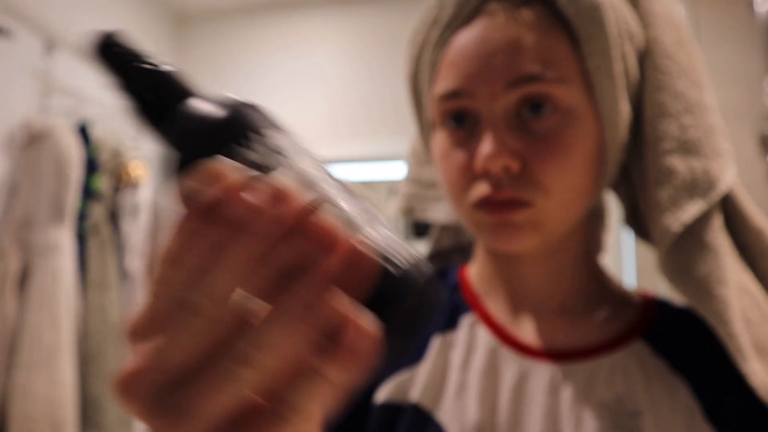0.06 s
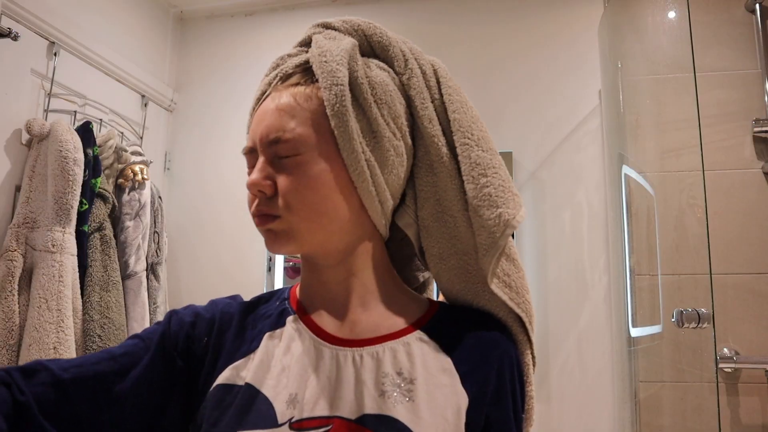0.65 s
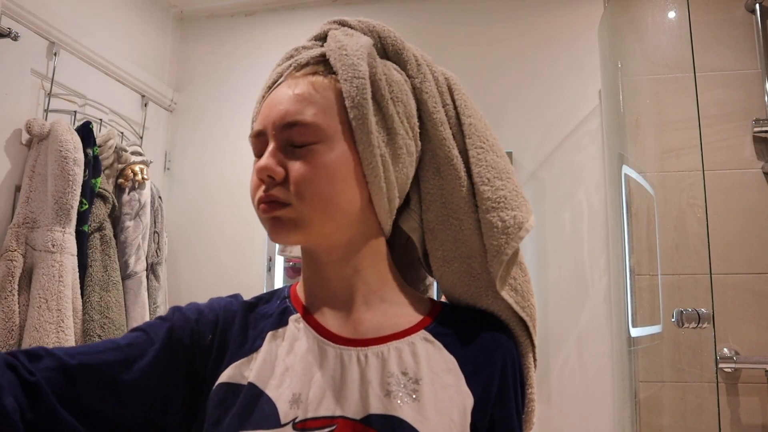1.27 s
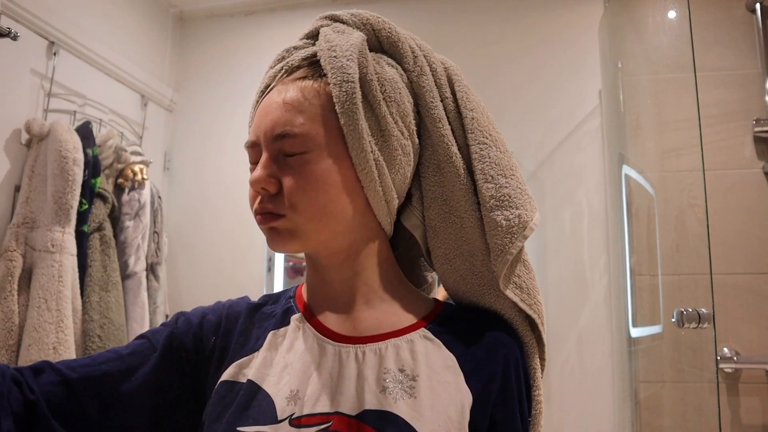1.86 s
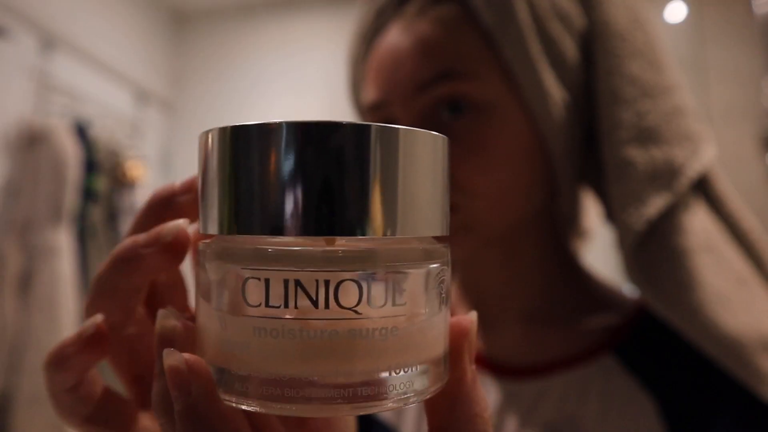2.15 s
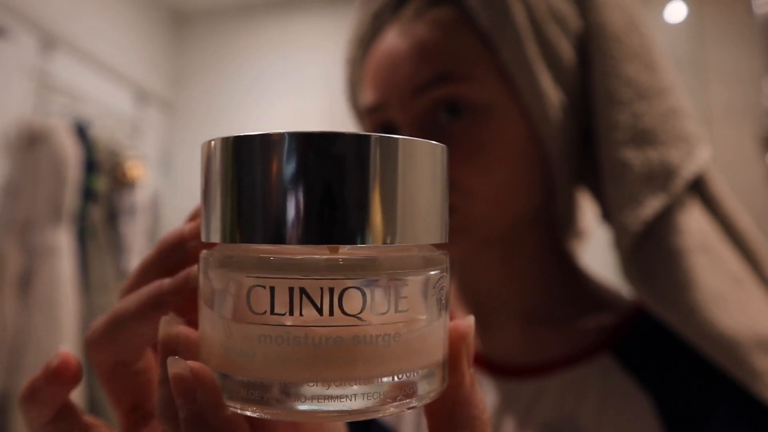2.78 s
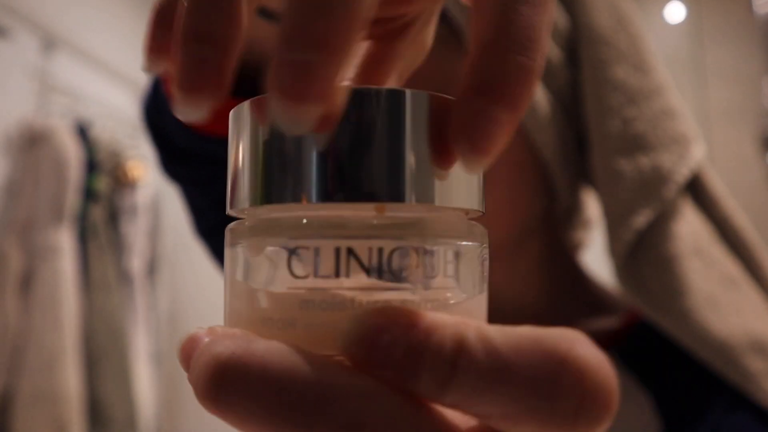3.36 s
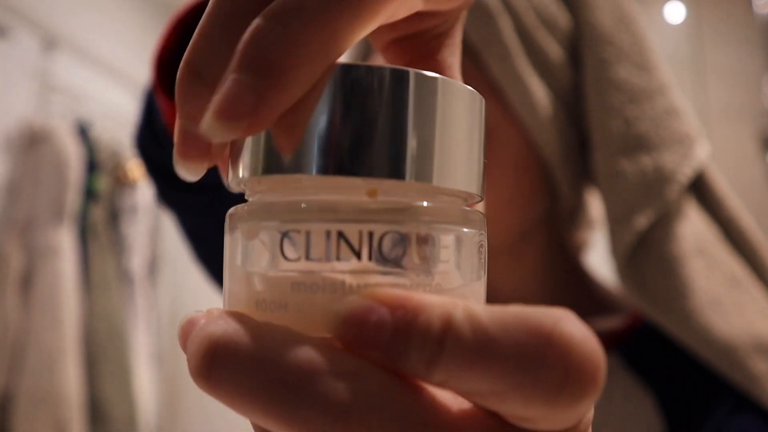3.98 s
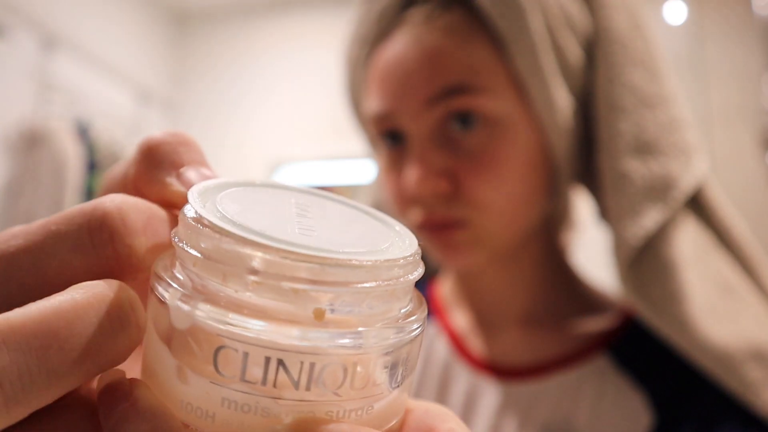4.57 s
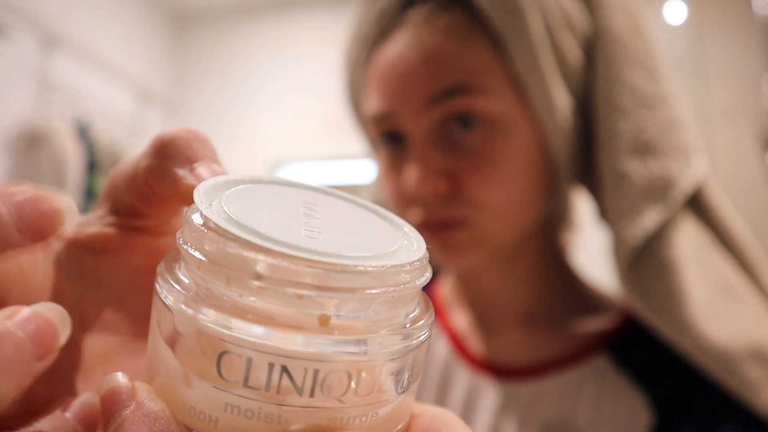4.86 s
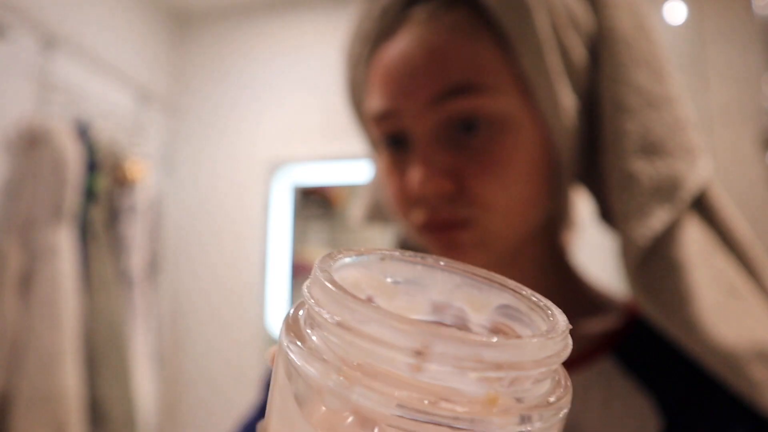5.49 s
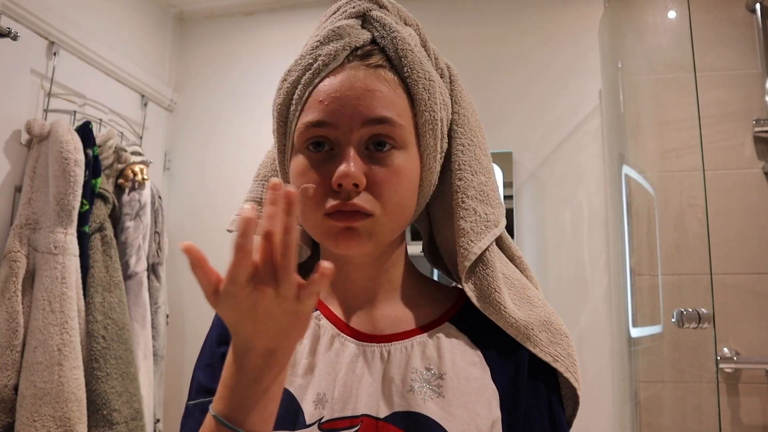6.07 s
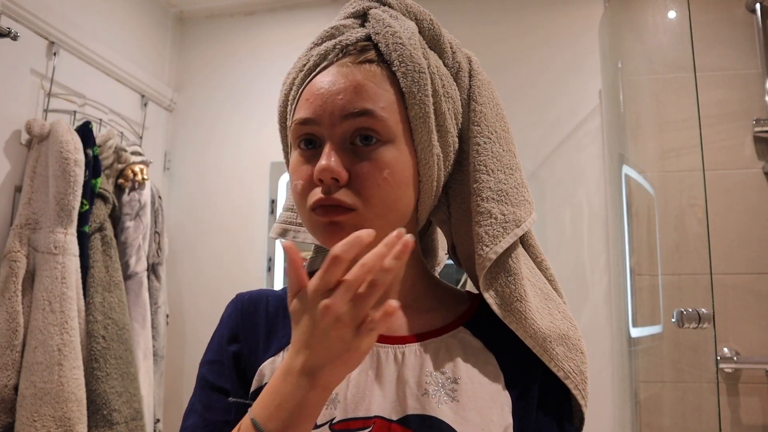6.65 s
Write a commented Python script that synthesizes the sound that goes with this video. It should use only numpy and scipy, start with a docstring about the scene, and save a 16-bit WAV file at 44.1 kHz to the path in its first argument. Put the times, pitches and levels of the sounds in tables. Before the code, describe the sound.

For the first half second a small spray bottle is shaken five times, its liquid splashing and glugging. From about 0.5 to 2 seconds it is pumped eight times in quick hissing puffs, with tiny gurgles and a plastic click as the pump returns at the end. Between 2.1 and 3 seconds fingernails tap a glass cream jar about six times, each a crisp click with a soft thud and faint ring. From 3.2 to 4.2 seconds the lid is unscrewed with uneven hollow knocks and light grinding on the thread. The plastic inner seal squeaks briefly on the rim at 4.3 seconds, then comes free around 5 seconds with a soft pop and a slight brush. Only faint room hiss remains until the end, at about 6.5 seconds. Everything is close to the microphone, with short echoes from tiled bathroom walls.

```python
"""Close-up skincare in a small bathroom

A spray bottle is shaken, its liquid splashing and glugging, then pumped eight times in hissing puffs.
Fingernails tap a glass cream jar and set it ringing. Its lid knocks and grinds on the thread as it is
unscrewed; the plastic inner seal squeaks on the rim and pops free. Tiled walls add short echoes."""
import sys
import numpy as np
from scipy import signal
from scipy.fft import rfft, irfft, next_fast_len
from scipy.io import wavfile

SR = 44100
rng = np.random.default_rng(int(sys.argv[2]) if len(sys.argv) > 2 else 0)


def waveform_to_disk(signal):
    """Save audio, clipped to [-1, 1], as 16-bit WAV at the path in sys.argv[1]."""
    frames = np.transpose(np.atleast_2d(signal))
    scaled = np.clip(frames, -1, 1) * 32767
    samples = np.round(scaled).astype(np.int16)
    wavfile.write(sys.argv[1], SR, samples)


N = 296572
TIME = np.arange(N) / SR
SHORT = TIME[:SR // 3]   # time axis of one gesture

# pump strokes: start_s, stop_s, level_db
STROKES = [(0.531, 0.685, -34.5), (0.733, 0.914, -34.5), (0.945, 1.06, -34), (1.11, 1.272, -35),
           (1.279, 1.389, -34.5), (1.44, 1.605, -33), (1.639, 1.771, -34), (1.813, 2.02, -35)]
# droplet hiss: freq_hz, density_db
MIST_SPECTRUM = [(180, -46), (300, -13), (350, -24), (629, -14), (884, -9.5), (1020, -10), (1660, -7),
                 (2860, -2), (3660, -3), (7550, -1.5), (9970, -5.5), (11300, -8.5), (12000, -16),
                 (15600, -43), (22000, -120)]


def mist(start_db=-5.5, build_s=0.018, press_s=0.092, fade_db_per_s=259, dribble_db=-21):
    """The jet swells, sinks to a dribble and cuts off abruptly."""
    building_db = start_db * np.exp(-SHORT / build_s)
    fading = np.hypot(from_db(-fade_db_per_s * np.maximum(SHORT - press_s, 0)), from_db(dribble_db))
    jet = np.zeros(N)
    for start, stop, db in STROKES:
        gate = np.clip(np.minimum(SHORT, stop - start - SHORT) / 0.0051 + .5, 0, 1)
        add(jet, start, from_db(db + building_db) * fading * gate)
    droplets = rng.standard_normal(N) + 0.39 * grains(per_s=1500, spread_db=3.5)
    return in_room(jet * coloured(droplets, MIST_SPECTRUM), wet_db=-17)


# full piston returns: start_s, home_s, click_db, froth_db
RETURNS = [(0.913, 0.935, -18, -36), (2.0048, 2.058, -3, -38.5)]
# froth in the dip tube: freq_hz, density_db
FROTH_SPECTRUM = [(150, -23), (450, 2.5), (950, -2), (1600, -8.5), (2500, 4.5), (3400, -4), (4500, -8.5),
                  (8500, -5), (12000, -23)]


def pump(refill_s=0.1, bubble_hz=970, bubble_db=-40.5, gulp_gap_s=0.026, gulp_db=-36, froth_t60_s=0.27):
    """A held stroke draws a bubble into the dip tube; a full return clicks, gulps and sucks froth."""
    bubbles = [(s + refill_s, bubble_hz, bubble_db) for s, stop, _ in STROKES if stop > s + refill_s]
    piston, flow = np.zeros(N), np.zeros(N)
    for s, home, click_db, froth_db in RETURNS:
        gulps = [at for at in (s - gulp_gap_s, s, s + gulp_gap_s) if at < home]
        bubbles += [(at, bubble_hz * rng.uniform(0.89, 1.04), gulp_db) for at in gulps]
        add(piston, s, plastic_tick(click_db, hz=2630))
        suction = from_db(froth_db - 60 * np.maximum(TIME - s, 0) / froth_t60_s)
        flow += suction * (1 - until(s)) * until(home)
    air = glugs(bubbles, t60_cycles=18.4, scatter_s=0.0059, fragment_db=-8.5)
    froth = flow * coloured(grains(per_s=2100, spread_db=5.5), FROTH_SPECTRUM)
    return in_room(air + piston, wet_db=-6) + froth + grip_rumble(froth, db=-12.5, lag_s=0.0035)


# liquid thrown against the bottle's ends: start_s, level_db, bulk_lag_s, air_hz, air_db
THROWS = [(0.003, -27, 0.025, 1260, -18), (0.111, -30, .005, 1820, -9.5), (0.197, -30.5, 0.013, 1490, -31),
          (0.286, -31.5, .013, 1790, -13), (0.393, -29.5, .014, 1370, -26)]
# splashing liquid: freq_hz, density_db
SPLASH_SPECTRUM = [(88, -51), (150, -25), (427, -16.5), (700, -12), (767, -11), (1480, -8.5), (1820, -4.5),
                   (1950, -7.5), (2430, -7.5), (4140, -8.5), (8470, -9), (12000, -25), (15600, -56),
                   (22000, -120)]


def splashes(bulk_db=0.3, rise_s=.0025, t60_s=0.25):
    """The first drops of each throw land, then the bulk; both burst into droplets that settle."""
    power, t = np.zeros(N), TIME[:SR // 2]
    for s, db, lag, _, _ in THROWS:
        for lands, level_db in (s, db), (s + lag, db + bulk_db):
            rise = np.exp(np.minimum(t - lands, 0) / rise_s)
            decay = from_db(level_db - 60 * np.maximum(t - lands, 0) / t60_s)
            add(power, 0, (rise * decay) ** 2)
    return np.sqrt(power) * coloured(grains(per_s=9000, spread_db=4.5), SPLASH_SPECTRUM)


# ticks of the shaken bottle: start_s, level_db, centre_hz
BOTTLE_TICKS = [(0.1990, -4, 5000), (0.2843, 9, 7540), (0.3952, -1, 5740)]
# air above the liquid: freq_hz, level_db, t60_s
HEADSPACE_MODES = [(1300, -70, 0.07), (1797, -50, 0.08)]


def shaken_bottle(settle_s=.025, settle_db=-27, settle_ratio=.94, end_s=.475):
    """Each throw splashes and traps air, which glugs again, lower, as it settles."""
    trapped = [(s + lag, hz, db) for s, _, lag, hz, db in THROWS]
    settling = [(s + settle_s * rng.uniform(1, 1.3), hz * settle_ratio, settle_db)
                for s, hz, _ in trapped]
    air = glugs(trapped + settling, t60_cycles=13.6, scatter_s=.006, fragment_db=-6)
    shake = splashes() + air
    for s, db, hz in BOTTLE_TICKS:
        add(shake, s, plastic_tick(db, hz))
    airborne = in_room(shake + body(shake, HEADSPACE_MODES), wet_db=-14.5)
    return (airborne + grip_rumble(shake, db=-24.5, lag_s=0.0063)) * until(end_s)


def glugs(pockets, t60_cycles, scatter_s, fragment_db, spread_octaves=0.75, fragments=7):
    """Each air pocket (start_s, pitch_hz, level_db) rings; bubbles of other sizes break off after it."""
    out = np.zeros(N)
    for s, hz, db in pockets:
        add(out, s, ring(click(db), hz, t60_cycles / hz))
        for delay, detune, polarity in rng.uniform(-1, 1, (fragments, 3)):
            pitch_hz = hz * 2 ** (spread_octaves * (detune + 0.31))
            bubble = ring(click(db + fragment_db), pitch_hz, t60_cycles / pitch_hz)
            add(out, s + scatter_s * abs(delay), np.sign(polarity) * bubble)
    return butter(butter(out, 300, "high"), 5900, "low")


def plastic_tick(db, hz):
    """A short snap of hard plastic."""
    return butter(click(db), [hz * 0.72, hz * 1.28], "band", order=3)


# taps on the jar: start_s, nail_db, fingertip_db
TAPS = [(2.139, -16, -11), (2.206, -13.5, 1), (2.396, -3, 0.5), (2.5796, -2.5, -1), (2.7585, -1.5, -1.5),
        (2.9441, -6, -6)]
# nail clack: freq_hz, level_db, t60_s
NAIL_MODES = [(4740, -67, .008), (7050, -12, 0.0075), (7980, -12.5, 0.008), (9430, -17, 0.0076),
              (10830, -19.5, .009)]
# jar glass: freq_hz, level_db, t60_s
GLASS_MODES = [(1244, -9, .22), (2401, -4, .19), (4511, -7, .11), (5949, -1, .11), (6780, -4, .07),
               (8285, 6, .1), (9770, -5, .1), (10990, 4, .09)]
# cap edge: freq_hz, level_db, t60_s
CAP_MODES = [(3984, -1, 0.16), (4510, 0.9, 0.051)]
# cap ring relative to the nail, as the fingers move down to the glass: time_s, level_db
CAP_SHARE = [(2.2, -28), (2.4, -48)]


def nail_taps(snap_db=5, clack_db=1.5, thud_db=0.5, glass_db=-37.5, touch_lag_s=.091, end_s=2.979):
    """The nail snaps and clacks, the fingertip thuds, the jar rings; a second finger lands lightly."""
    times, nail_db, fingertip_db = np.transpose(TAPS)
    pad, touch = clicks(times, fingertip_db), clicks(times + touch_lag_s, fingertip_db)
    snap = from_db(snap_db) * butter(clicks(times, nail_db) + from_db(-13) * touch, 8500, "high")
    clack = from_db(clack_db) * struck(times + .0005, nail_db, NAIL_MODES, scatter_db=1.5)
    thud = from_db(thud_db) * butter(pad, 2130, "low", order=6) + from_db(-26) * pad
    pat = from_db(-11.5) * butter(touch, [800, 2800], "band", order=1)
    glass = body(clicks(times, glass_db + 0.67 * nail_db), GLASS_MODES)
    cap_db = nail_db + np.interp(times, *np.transpose(CAP_SHARE))
    cap = body(clicks(times, cap_db), CAP_MODES)
    # the snap radiates all round, so the walls return more of it
    taps = in_room(clack, wet_db=-10) - in_room(snap, wet_db=-1) - in_room(thud + pat, wet_db=-17)
    return (taps + glass + cap + grip_rumble(thud, db=-14, lag_s=0.0069)) * until(end_s)


# lid knocks on the thread: start_s, level_db, clack_rel_db, hollow_hz, hollow_rel_db
KNOCKS = [(3.195, -12.5, -12.5, 593, -6), (3.409, -35, -16, 362, 9.5), (3.4290, -26.5, -8, 670, 4.5),
          (3.628, -22, 0, 553, 2), (3.6844, -29, 12.5, 503, -9), (3.6868, -12.5, -4, 514, -0.5),
          (3.7169, -14, -1, 543, -19), (3.7790, -39.5, -12, 490, 17.5), (3.8210, -20.5, -10.5, 365, 1.5),
          (4.0083, -19, -10.5, 371, 0.5), (4.071, -28, -20, 490, 4), (4.137, -25, 3.5, 537, -6.5)]
# gripped metal-clad lid: freq_hz, level_db, t60_s
LID_MODES = [(760, -4, 0.0081), (1130, -8.5, 0.014), (1294, 0, 0.026), (1540, -42, 0.011),
             (2310, -11, 0.02), (3100, -17, 0.011), (3560, -9.5, 0.023), (4830, -26, 0.0084),
             (6740, -13, 0.023)]
# lid between touches: freq_hz, level_db, t60_s
FREE_LID_MODES = [(560, -14, 0.12), (1360, -17, 0.061), (1543, -3, 0.1), (2404, -6, 0.046),
                  (3486, -6, 0.073)]


def lid(contact_hz=2460, finger_cut_hz=1920, free_db=-23, jolt_db=14.5):
    """The lid knocks and rubs as it turns; each knock rings it and jolts the jar in the palm."""
    times, knock_db, clack_db, _, _ = np.transpose(KNOCKS)
    contacts = butter(clicks(times, knock_db), contact_hz, "low", order=1)
    clacks = struck(times, knock_db + clack_db, LID_MODES, scatter_db=2.5)
    clacks = butter(clacks, contact_hz, "low", order=1)
    # the fingers soak up the treble, which only hard contacts bring out
    damped = butter(body(contacts, LID_MODES), finger_cut_hz, "low", order=6)
    treble = butter(clacks, 2130, "high", order=4)
    free = from_db(free_db) * body(contacts, FREE_LID_MODES)
    jolt = from_db(jolt_db) * butter(contacts, [152, 400], "band", order=1)
    grind, hiss = thread_rubs()
    airborne = in_room(damped + treble + free + hand_hollow() + grind + hiss, wet_db=-13)
    return airborne + jolt + grip_rumble(grind, db=-13.5, lag_s=0.0065)


def hand_hollow(gripped_t60_s=0.023, loose_extra_s=0.11, loosening_s=0.056):
    """Knocks ring the air cupped under the hand: pitched by the grip, longer as the lid comes free."""
    out, last_knock_s = np.zeros(N), KNOCKS[-1][0]
    for s, db, _, hz, hollow_db in KNOCKS:
        puff = butter(butter(click(db + hollow_db), 1370, "low"), hz * .5, "high")
        t60_s = gripped_t60_s + loose_extra_s * np.exp((s - last_knock_s) / loosening_s)
        add(out, s, ring(puff, hz, t60_s))
    return out


# lid slides on the thread: peak_s, width_s, grind_db, hiss_db
RUBS = [(3.401, 0.027, -43.5, -48.5), (3.733, 0.023, -39.5, -58), (3.793, 0.019, -38, -57),
        (4.01, 0.01, -40, -59), (4.113, 0.007, -41, -56)]


def thread_rubs(hollow_hz=446, hollow_t60_s=0.023, hollow_db=-1.5):
    """Tiny slips ring the lid and stir the air under the hand; returns grind and hiss."""
    times, widths, grind_db, hiss_db = np.transpose(RUBS)
    slips = butter(grains(per_s=1200, spread_db=3.5), 500, "low", order=1)
    hollow = from_db(hollow_db) * rms_one(ring(slips, hollow_hz, hollow_t60_s))
    grind = swells(times, widths, grind_db) * (rms_one(body(slips, LID_MODES)) + hollow)
    friction = butter(grains(per_s=12000, spread_db=7), [2500, 10000], "band", order=1)
    return grind, swells(times, widths, hiss_db) * rms_one(friction)


# fingers and seal brush the rim: peak_s, width_s, rim_db, hiss_db
BRUSHES = [(4.304, 0.0054, -34.5, -64), (5.036, 0.004, -51, -47), (5.12, 0.0088, -56, -50)]
# open jar's rim: freq_hz, level_db, t60_s
RIM_MODES = [(930, 6, 0.018), (1150, 0, 0.017), (1385, 3, 0.033), (2000, -3, 0.019), (2700, 1, 0.0055),
             (3300, -17, 0.022), (4330, -16, .015), (5300, -4, 0.012)]
# skin and plastic squeak on the rim: peak_s, width_s, level_db, pitch_hz
SQUEAKS = [(4.306, 0.0061, -29.5, 834), (4.82, 0.013, -60.5, 1100), (5.124, 0.0042, -42.5, 3300)]
# bent seal: freq_hz, level_db, t60_s
SEAL_MODES = [(402, -44, 0.13), (690, -48, .045), (1550, -35, 0.018), (3300, -45, 0.015)]


def seal_peel(pop_s=5.035, spring_lag_s=0.07, spring_db=-9):
    """Edges brush and squeak on the rim; the seal pops free, then springs straight."""
    times, widths, rim_db, hiss_db = np.transpose(BRUSHES)
    rim = swells(times, widths, rim_db) * rms_one(body(grains(per_s=3300, spread_db=2.5), RIM_MODES))
    friction = butter(grains(per_s=8300, spread_db=5.5), [2500, 9000], "band", order=1)
    hiss = swells(times, widths, hiss_db) * rms_one(friction)
    squeaks = sum(swells([s], [width], [db]) * stick_slip(hz) for s, width, db, hz in SQUEAKS)
    flick = body(clicks([pop_s, pop_s + spring_lag_s], [0, spring_db]), SEAL_MODES)
    out = in_room(rim + hiss + squeaks + flick, wet_db=-11.5)
    add(out, pop_s, seal_plop())
    return out + grip_rumble(rim, db=-12.5, lag_s=0.05)


def seal_plop(level_db=-36.5, end_hz=48, drop_hz=342, glide_s=0.0054, t60_s=0.095):
    """The plop falls in pitch as the gap widens."""
    t = TIME[:SR // 4]
    pitch_hz = end_hz + drop_hz * np.exp(-t / glide_s)
    return from_db(level_db - 60 * t / t60_s) * np.sin(2 * np.pi * np.cumsum(pitch_hz) / SR)


def stick_slip(hz, step_db=-26):
    """Squeak tone: three harmonics, each weaker than the last."""
    return sum(from_db(step_db * k) * np.sin(2 * np.pi * hz * (k + 1) * TIME) for k in range(3))


def grip_rumble(sound, db, lag_s, band_hz=(25.1, 273)):
    """Whatever moves a container shifts the grip on it: a rumble that trails the sound's strength."""
    pole = np.exp(-1 / (lag_s * SR))
    strength = np.sqrt(signal.lfilter([1 - pole], [1, -pole], sound ** 2 + 1e-18))
    return from_db(db) * strength * rms_one(butter(rng.standard_normal(N), band_hz, "band"))


def in_room(x, wet_db, t60_s=0.34, wall_cut_hz=8200):
    """Adds the dense echoes of tiled walls; the highest treble dies twice as fast."""
    t = TIME[:SR // 2]
    scatter = butter(rng.standard_normal(len(t)), 160, "high", order=1) * np.clip(t / 0.00096, 0, 1)
    decay = from_db(-60 * t / t60_s)
    echoes = butter(scatter, wall_cut_hz, "low", order=5) * decay
    echoes += butter(scatter, wall_cut_hz, "high", order=5) * decay ** 2
    return x + from_db(wet_db) * signal.fftconvolve(x, echoes / np.linalg.norm(echoes))[:N]


# noise floor: freq_hz, density_db
FLOOR_SPECTRUM = [(15, -30), (25, -7.5), (91, -3.5), (237, -5.5), (291, -5.5), (418, -10.5), (463, -8.5),
                  (615, -10.5), (954, -11), (1340, -14.5), (1970, -15.5), (2750, -17.5), (10300, -20),
                  (12000, -25.5), (15600, -67), (22000, -120)]


def noise_floor(level_db=-57):
    """Steady room air and microphone hiss."""
    return from_db(level_db) * coloured(rng.standard_normal(N), FLOOR_SPECTRUM)


def from_db(db):
    return np.exp(np.asarray(db) * (np.log(10) / 20))


def rms_one(x):
    return x / np.sqrt(np.mean(x ** 2) + 1e-20)


def butter(x, hz, kind, order=2):
    """Causal low-, high- or band-pass."""
    sos = signal.butter(order, np.clip(hz, 10, .45 * SR), kind, fs=SR, output="sos")
    return signal.sosfilt(sos, x + 1e-18)


def coloured(x, spectrum):
    """Shapes x by (freq_hz, density_db) points; rms 1."""
    hz, db = np.transpose(spectrum)
    size = next_fast_len(N)
    bins_hz = np.maximum(np.fft.rfftfreq(size, 1 / SR), 1)
    gain = from_db(np.interp(np.log(bins_hz), np.log(hz), db))
    return rms_one(irfft(rfft(x, size) * gain, size)[:N])


def grains(per_s, spread_db):
    """Random clicks of uneven size and either sign; rms 1."""
    sizes = from_db(spread_db * np.minimum(rng.exponential(1, N), 4)) * rng.choice([-1, 1], N)
    return rms_one(sizes * (rng.random(N) < per_s / SR))


def add(out, start_s, sound):
    at = max(round(start_s * SR), 0)
    out[at:at + len(sound)] += sound[:N - at]


def click(db):
    """One impulse, then silence to ring in."""
    return from_db(db) * signal.unit_impulse(len(SHORT))


def clicks(times, levels_db):
    out = np.zeros(N)
    for s, db in zip(times, levels_db):
        add(out, s, click(db))
    return out


def ring(x, hz, t60_s):
    """One mode: a unit impulse starts a dying cosine of height about 1."""
    radius, angle = from_db(-60 / (t60_s * SR)), 2 * np.pi * hz / SR
    return signal.lfilter([.5, 0, -.5], [1, -2 * radius * np.cos(angle), radius ** 2], x + 1e-18)


def body(x, modes):
    """All modes of an object, driven together."""
    return sum(from_db(db) * ring(x, hz, t60_s) for hz, db, t60_s in modes)


def struck(times, levels_db, modes, scatter_db):
    """Each blow lands on a new spot, giving every mode its own strength."""
    spots = rng.standard_normal((len(times), len(modes)))
    return sum(ring(clicks(times, levels_db + db + scatter_db * spot), hz, t60_s)
               for (hz, db, t60_s), spot in zip(modes, spots.T))


def swells(peaks_s, widths_s, levels_db):
    """A bell-shaped gain for each short slide."""
    out = np.zeros(N)
    for s, width, db in zip(peaks_s, widths_s, levels_db):
        start = max(s - 4 * width, 0)
        add(out, start, from_db(db) * np.exp(-.5 * ((SHORT + start - s) / width) ** 2))
    return out


def until(end_s):
    """Gain that shuts within a few milliseconds at end_s."""
    return np.clip((end_s - TIME) / 0.0064 + .5, 0, 1)


def scene():
    """All sources centred, as one microphone hears them."""
    spray = shaken_bottle() + pump() + mist()
    jar = nail_taps() + lid() + seal_peel()
    return np.tile(spray + jar + noise_floor(), (2, 1))


def record(dry, cutoff_hz=12000):
    """Steep low-pass."""
    return signal.sosfilt(signal.ellip(10, .1, 80, cutoff_hz, fs=SR, output="sos"), dry)


dry = scene()
out = record(dry)
waveform_to_disk(out)
```